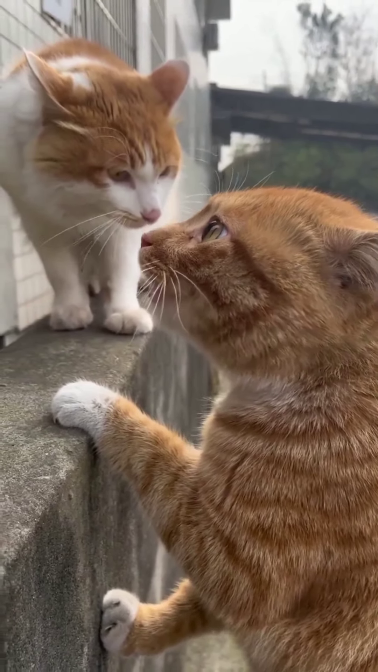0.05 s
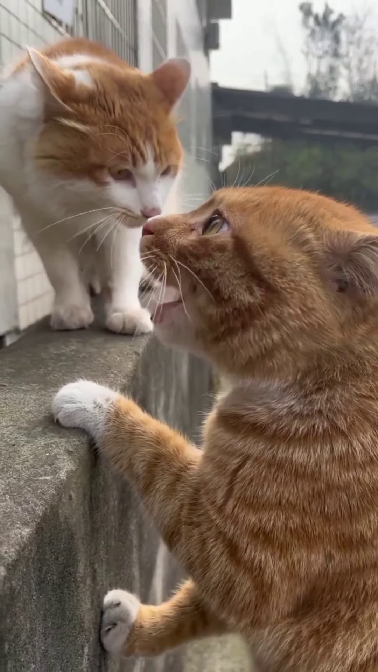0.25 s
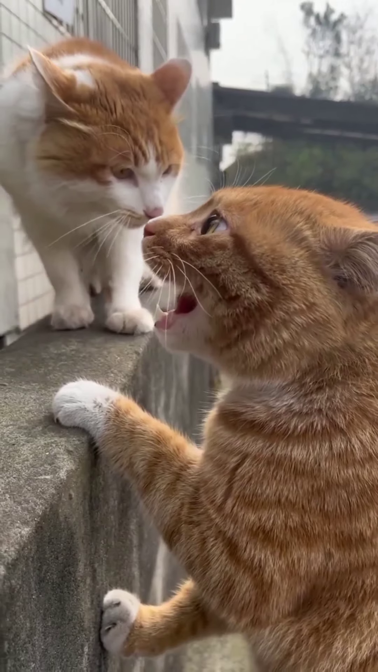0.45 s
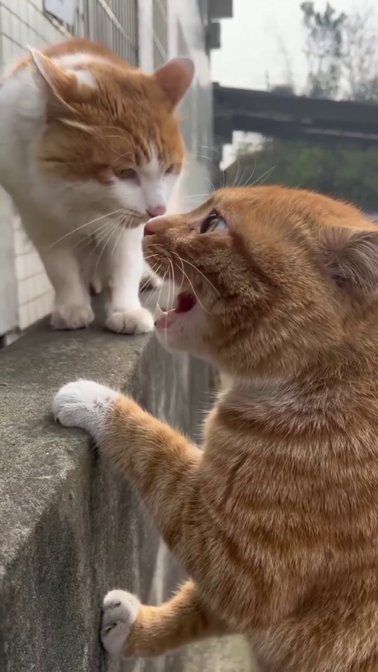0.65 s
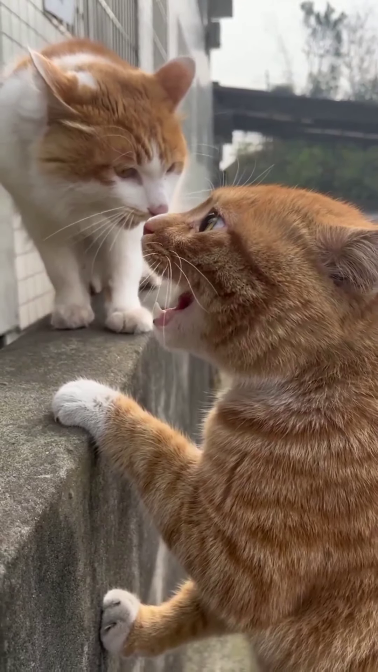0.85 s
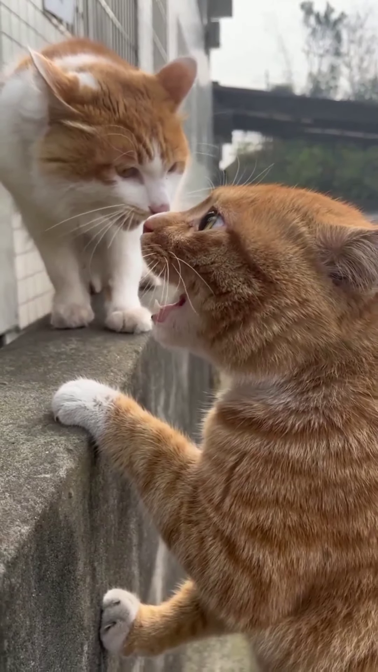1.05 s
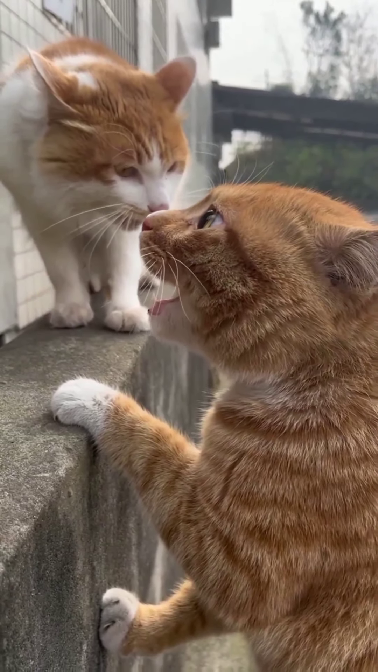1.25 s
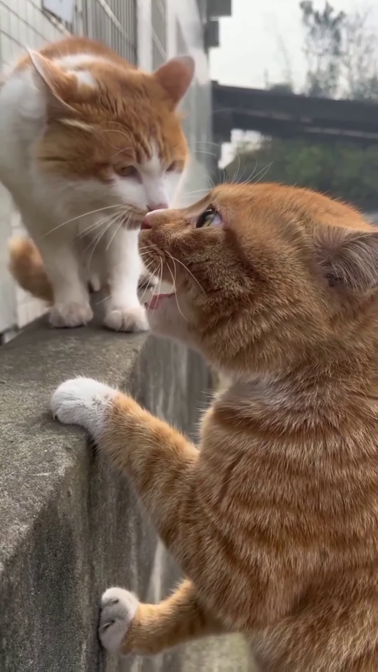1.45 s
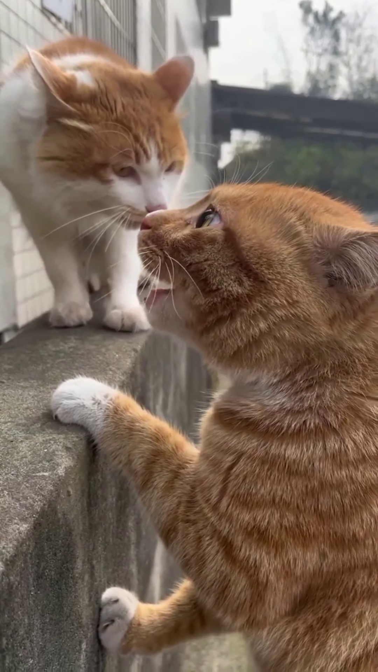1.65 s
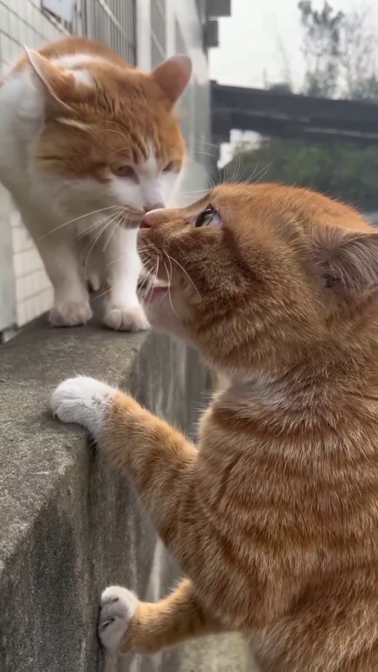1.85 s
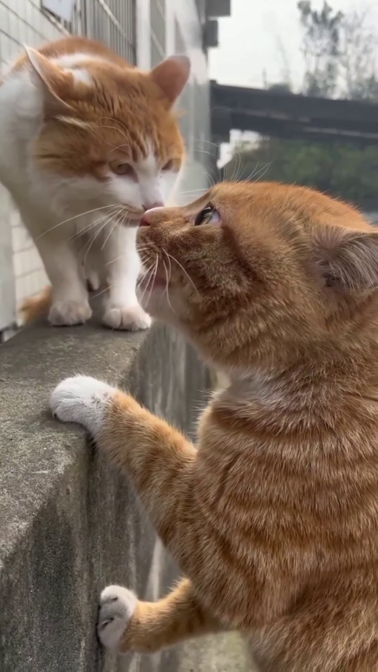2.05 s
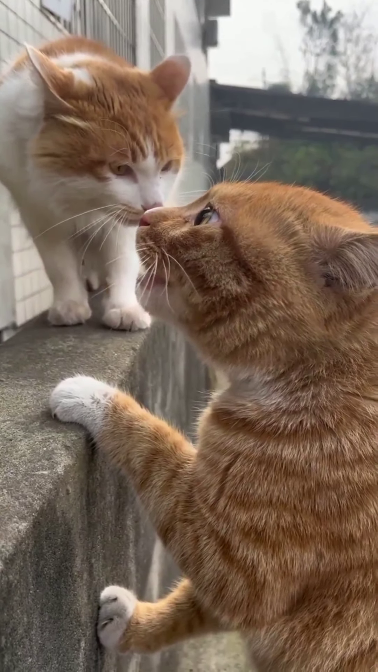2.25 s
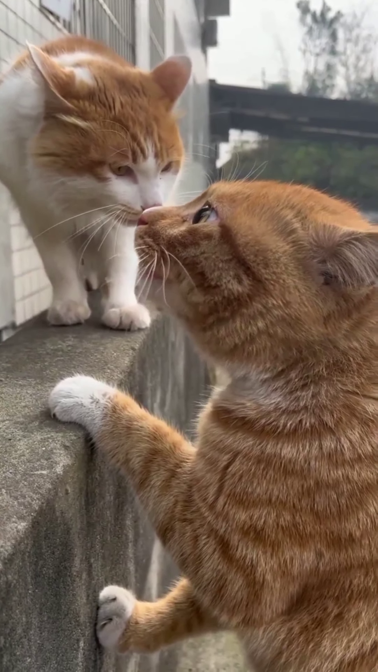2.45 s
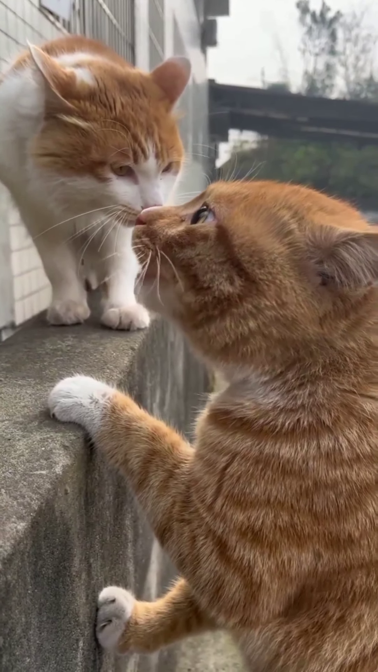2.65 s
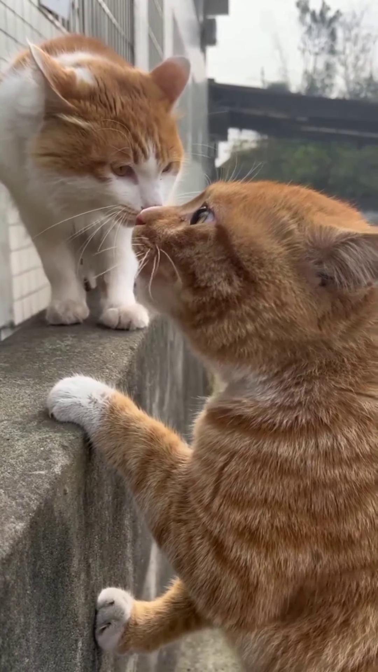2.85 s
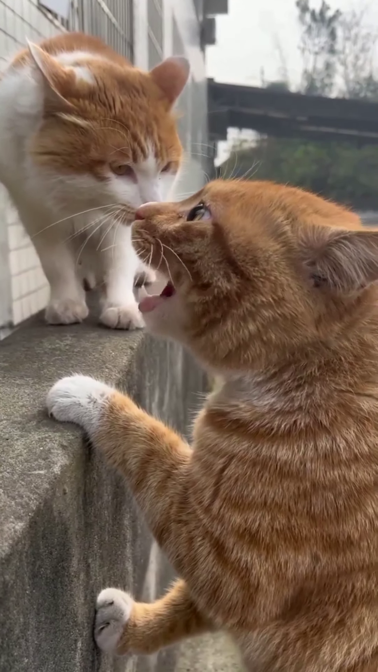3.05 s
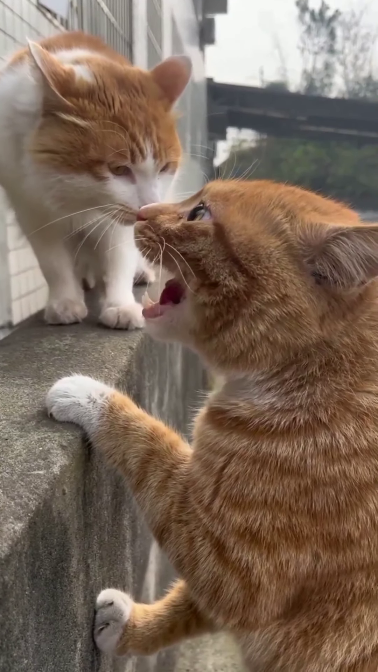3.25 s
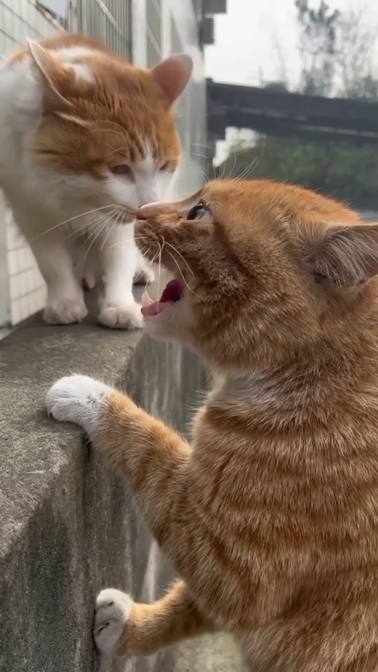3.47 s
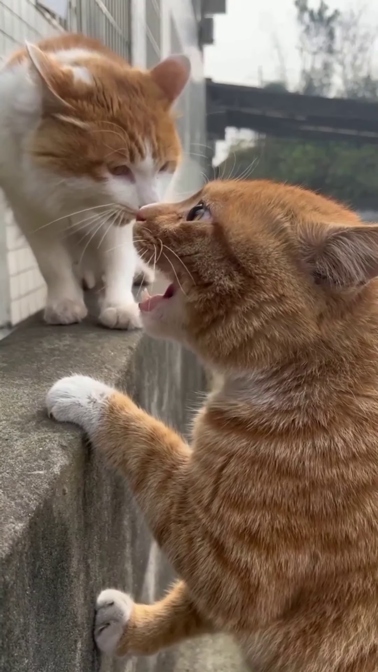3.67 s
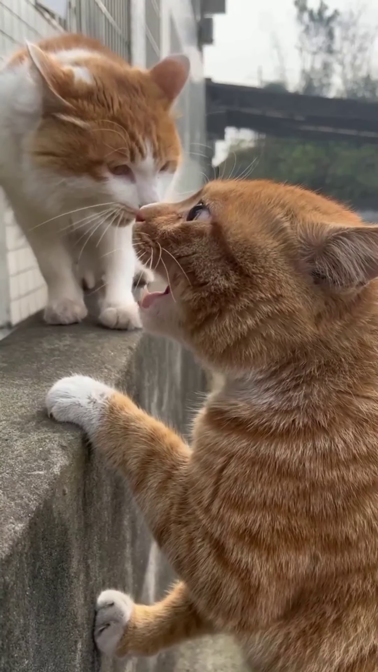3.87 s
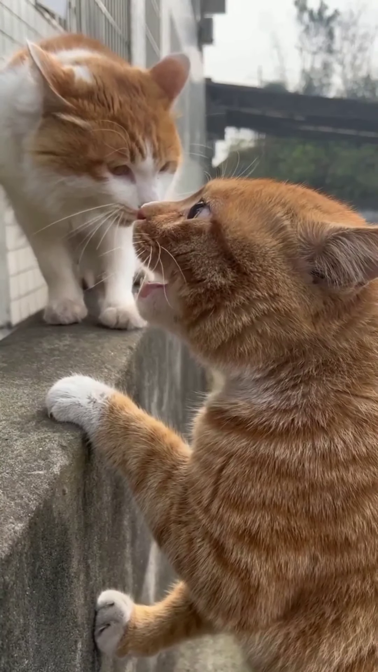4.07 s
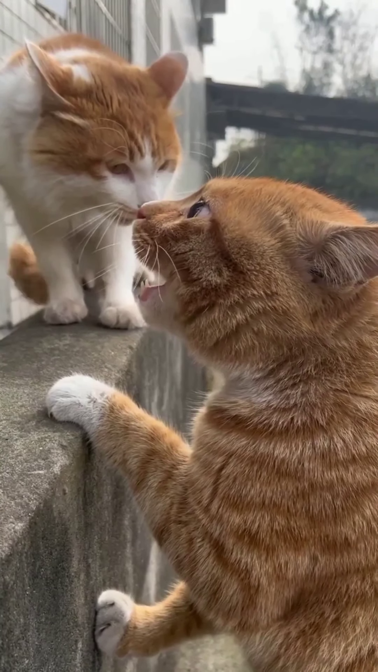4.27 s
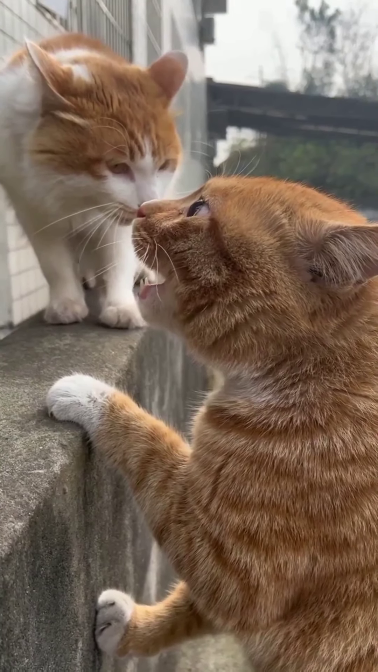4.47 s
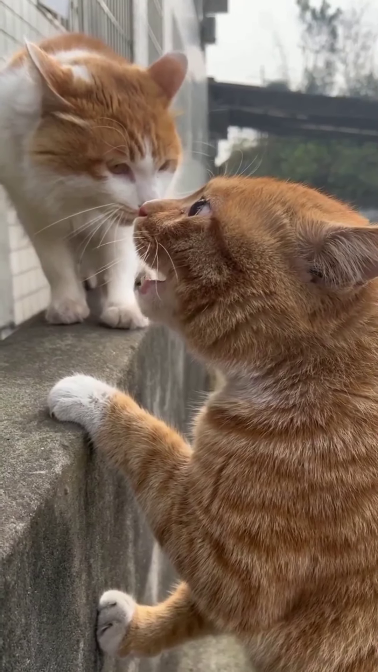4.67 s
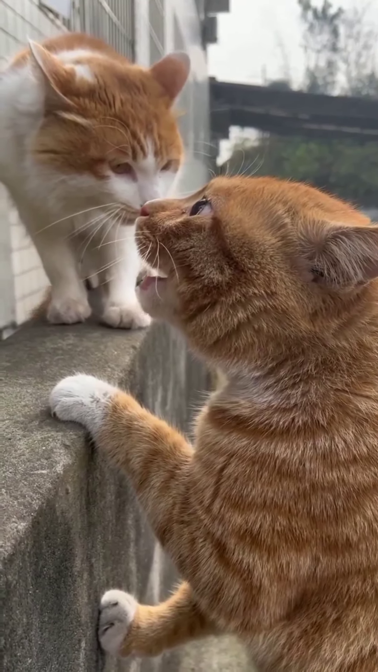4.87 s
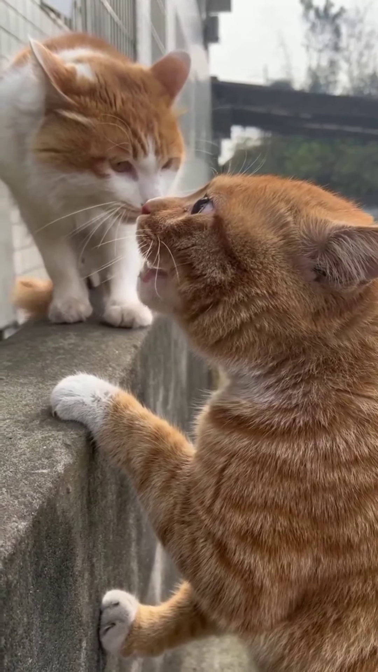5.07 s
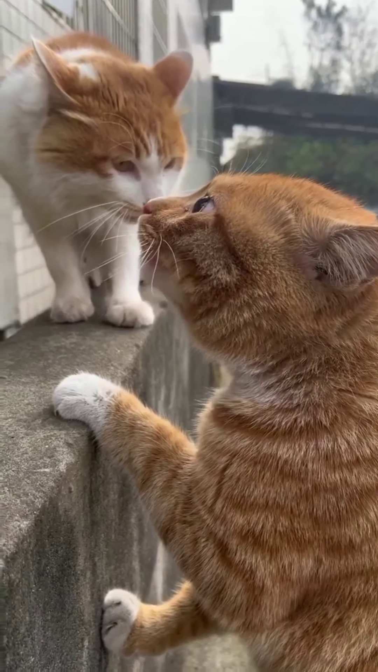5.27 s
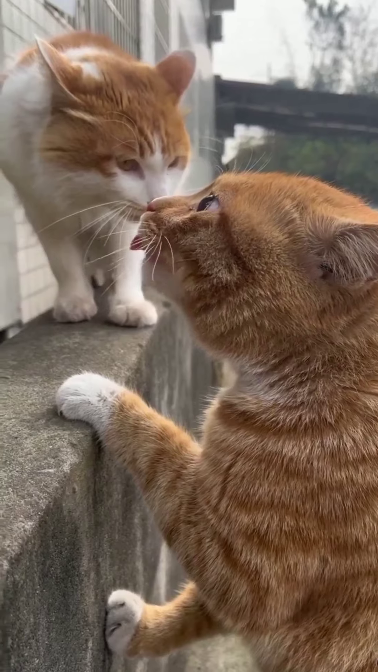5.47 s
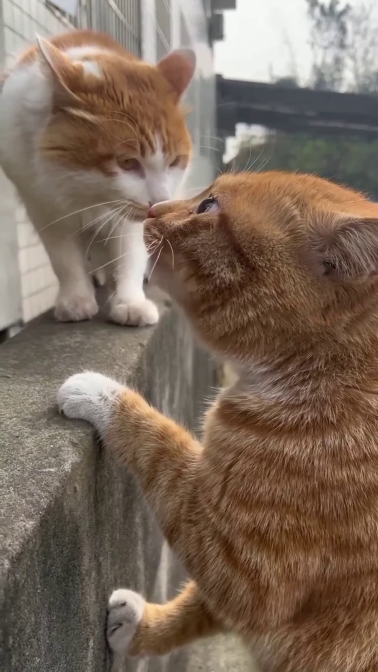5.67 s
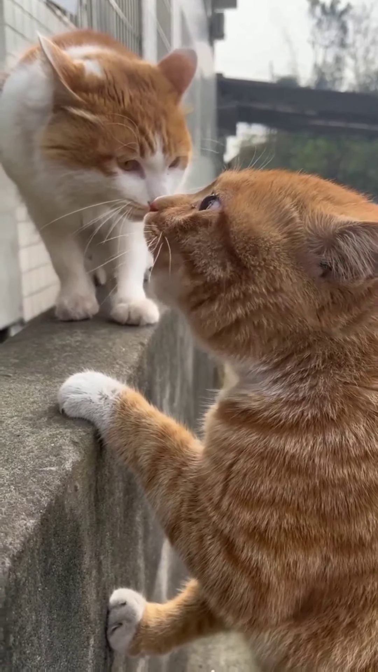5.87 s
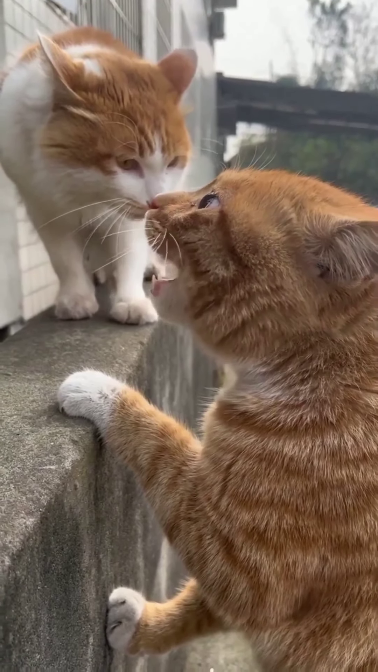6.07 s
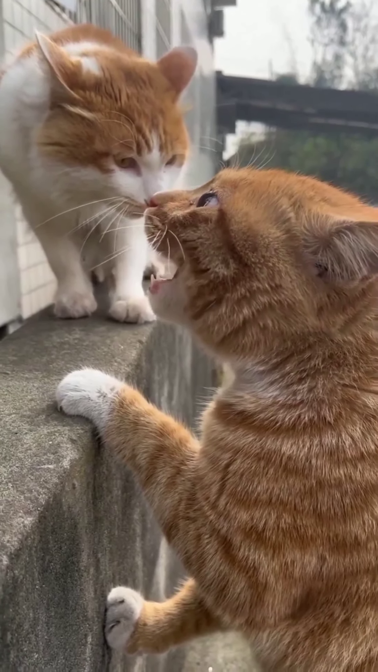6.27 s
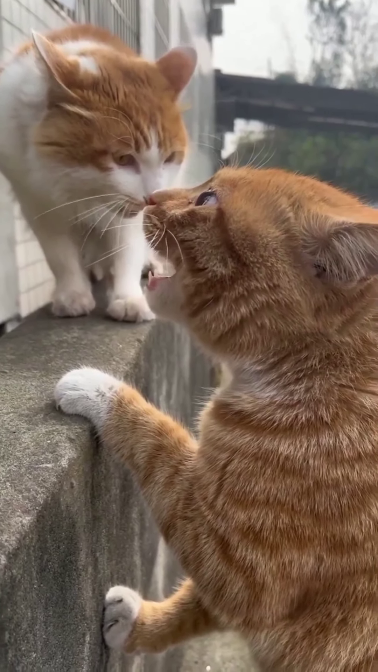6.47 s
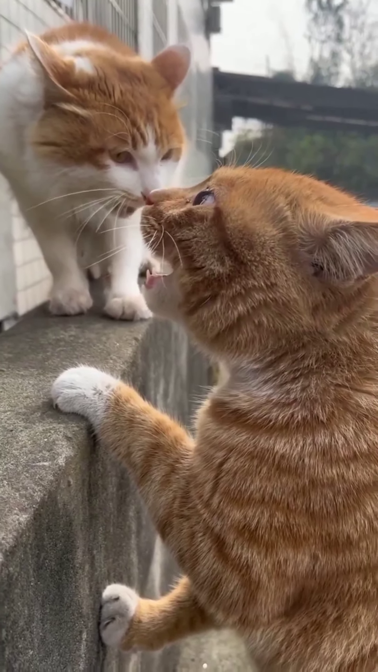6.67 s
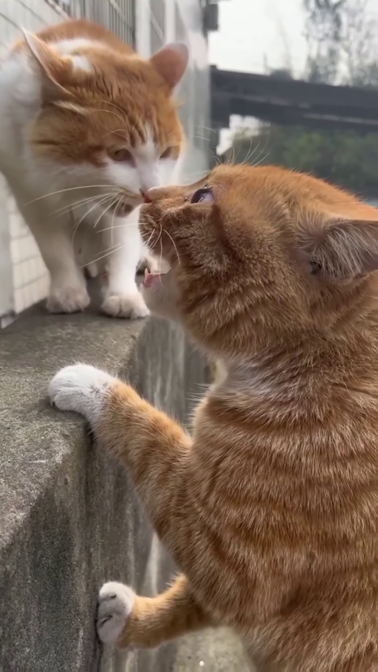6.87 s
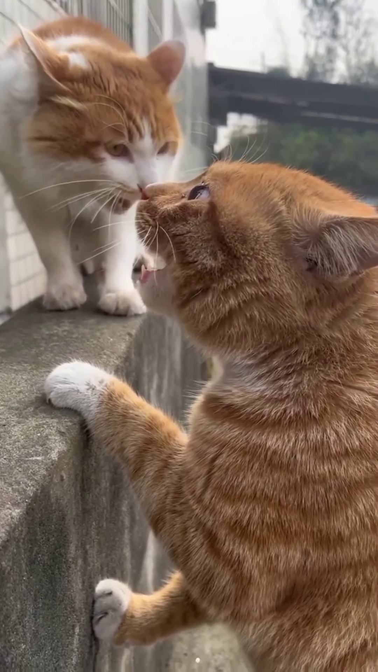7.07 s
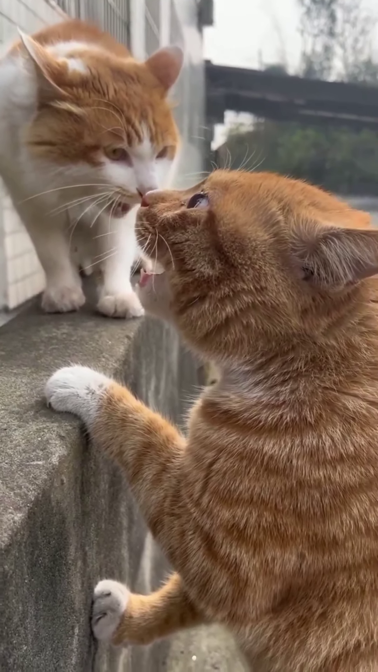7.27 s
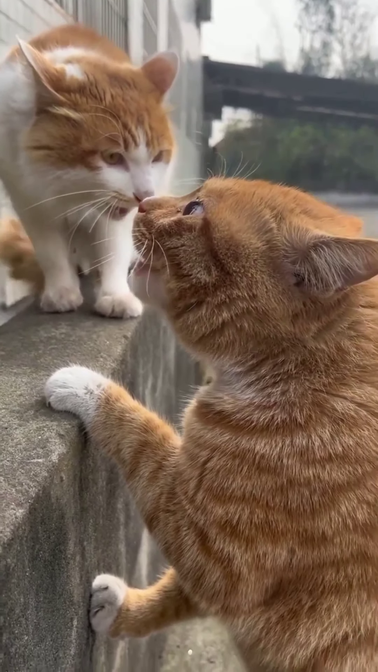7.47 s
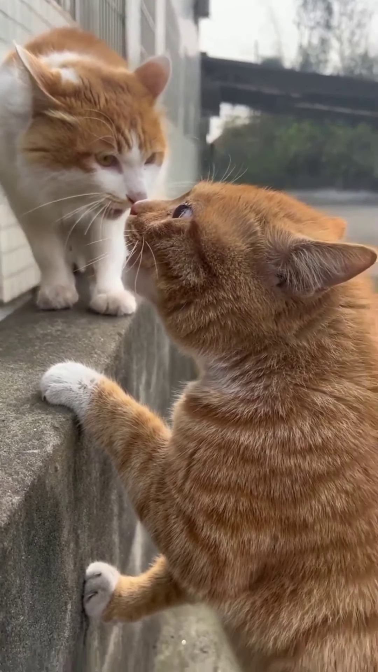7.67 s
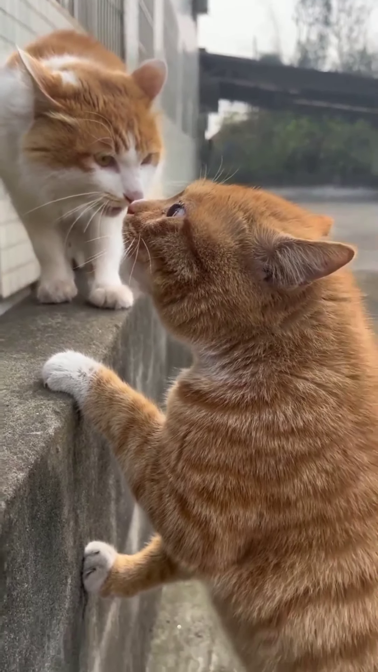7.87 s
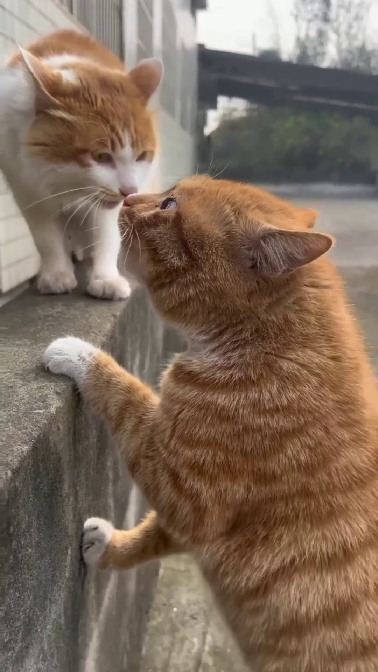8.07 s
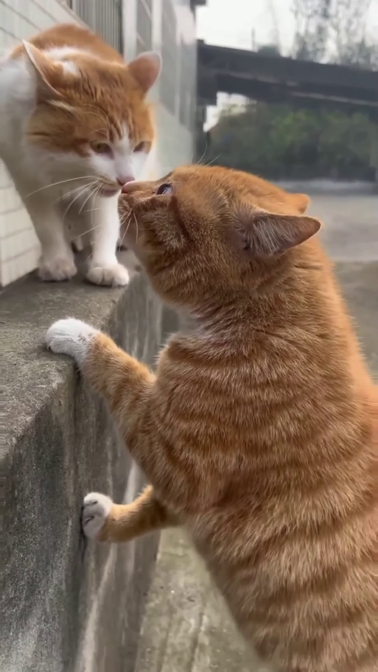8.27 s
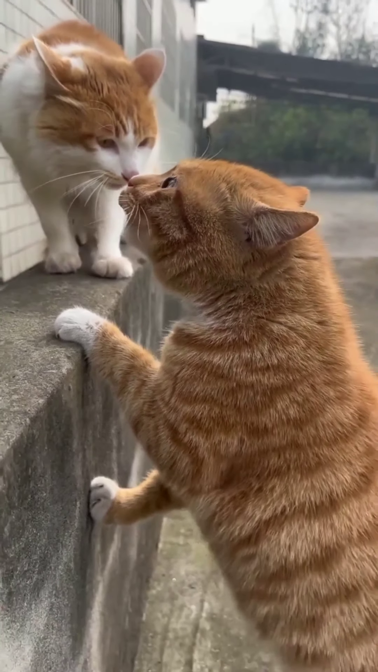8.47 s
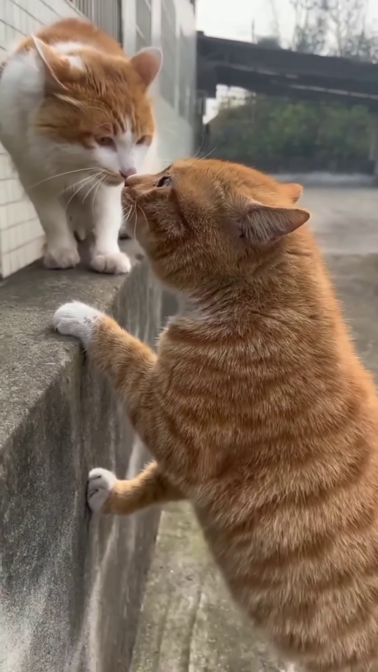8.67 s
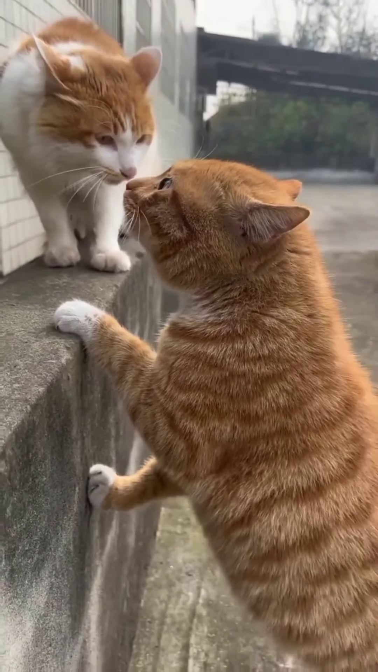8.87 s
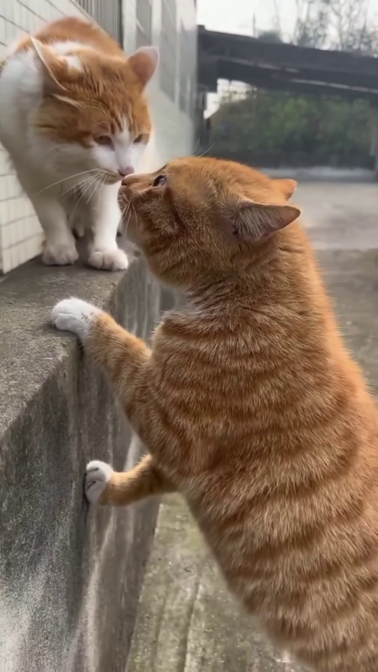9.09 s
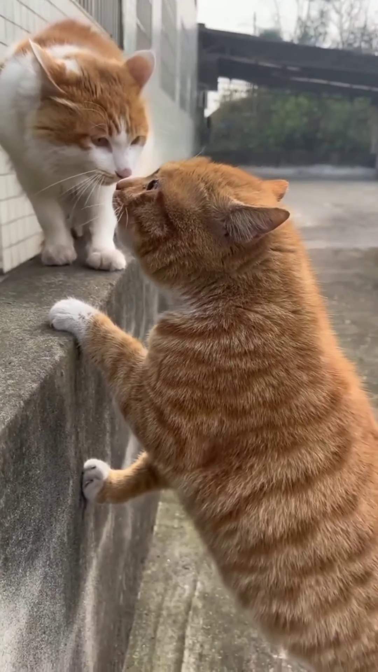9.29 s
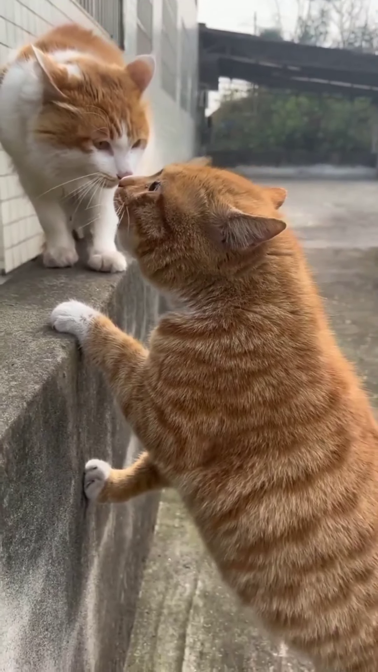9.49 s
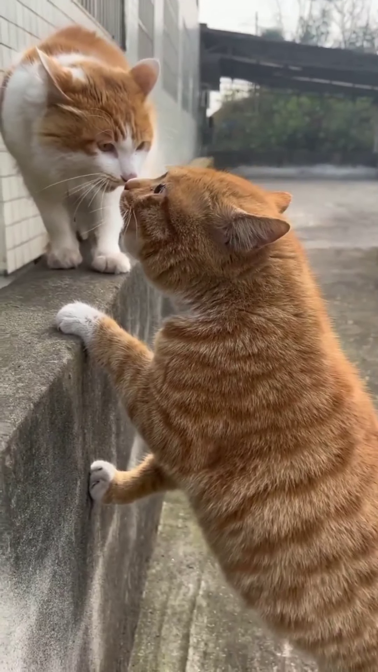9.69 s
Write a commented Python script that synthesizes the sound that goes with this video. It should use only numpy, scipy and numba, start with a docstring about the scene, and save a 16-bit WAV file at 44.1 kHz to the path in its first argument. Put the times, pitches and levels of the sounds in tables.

```python
"""Two cats yowl on a garden wall

Each long wail is a buzz of the vocal folds with hiss in every cycle, shaped by two moving mouth resonances.
A ginger and a white cat overlap, following drawn pitches; the jaw lifts the first resonance.
The treble glances off the wall top, and wall and ground return a faint, dull echo.
Behind them: a wavering engine drone, traffic rumble, a wash of air and three tiny claw scrapes."""
import sys
import numpy as np
from scipy import signal
from scipy.fft import rfft, irfft, next_fast_len
from scipy.io import wavfile
from scipy.ndimage import uniform_filter1d, map_coordinates
from numba import njit

SR = 44100
rng = np.random.default_rng(int(sys.argv[2]) if len(sys.argv) > 2 else 0)


def dump_mix(stems):
    """Bounce the given channels to the path in sys.argv[1] as a 16-bit WAV at rate SR."""
    frames = np.atleast_2d(stems).T  # one column per channel
    limited = np.clip(frames, -1, 1)  # hard clip at full scale
    pcm = np.round(limited * 32767).astype(np.int16)
    wavfile.write(sys.argv[1], SR, pcm)


N = 429093
TIME = np.arange(N) / SR
BINS_HZ = np.fft.rfftfreq(N, 1 / SR)
TOP_HZ = 13200


def undb(db):
    """Decibels to gain."""
    return 10 ** (np.asarray(db) / 20)


def unit(x):
    """Scale to rms 1."""
    return x / np.sqrt(np.mean(x ** 2))


def curves(table, t):
    """Columns of a table, joined by straight lines along the first."""
    s, *columns = np.transpose(table)
    return [np.interp(t, s, column) for column in columns]


def along(points, hz):
    """Read (Hz, value) points on a log-frequency axis."""
    f, value = np.transpose(points)
    return np.interp(np.log(hz + 1), np.log(np.abs(f) + 1), value)


def colour(x, points):
    """Filter by a (Hz, dB) spectrum."""
    size = next_fast_len(len(x) + SR // 10)
    gain = undb(along(points, np.fft.rfftfreq(size, 1 / SR)))
    return irfft(rfft(x, size) * gain, size)[:len(x)]


def walk(rate_hz, size):
    """Smooth random curve of rms 1 that changes about rate_hz times a second."""
    hold = max(int(SR / rate_hz), 2)
    steps = np.repeat(rng.standard_normal(size // hold + 2), hold)
    return unit(uniform_filter1d(steps, hold)[:size])


# distant traffic, before the level offsets: time_s, drone_db, rumble_db
TRAFFIC_LEVELS = [(0, -65, -49.5), (1.5, -52.5, -56.5), (2.8, -62.5, -60), (3.8, -62, -56.5),
                  (5.2, -53, -59.5), (6.6, -64, -56), (7.2, -52.5, -58), (7.7, -71.5, -56),
                  (8.7, -60, -56.5), (9.2, -59, -55.5), (9.73, -63.5, -58)]
# rumble spectrum, relative: freq_hz, density_db
RUMBLE_SPECTRUM = [(25, -28.5), (45, -9.5), (62, 4), (90, -1.5), (125, -9), (200, -11.5), (400, -50.5)]
# air spectrum, relative: freq_hz, density_db
AIR_SPECTRUM = [(60, -13), (170, -4), (300, -3.5), (600, -12.5), (1400, -19.5), (2500, -32.5),
                (5000, -40.5), (13000, -53)]


def traffic(drone_hz, drone_offset_db, rumble_offset_db, air_db):
    """Wavering sine engine drone and noise rumble, alike in both ears, under a thin wide wash of air."""
    drone_db, rumble_db = curves(TRAFFIC_LEVELS, TIME)
    phase = 2 * np.pi * np.cumsum(drone_hz * (1 + 0.16 * walk(9.8, N))) / SR
    drone = unit(np.sin(phase) * undb(2.3 * walk(16, N))) * undb(drone_db + drone_offset_db)
    rumble = unit(colour(rng.standard_normal(N), RUMBLE_SPECTRUM)) * undb(rumble_db + rumble_offset_db)
    mid = colour(rng.standard_normal(N), AIR_SPECTRUM)
    side = colour(rng.standard_normal(N), AIR_SPECTRUM)
    side = colour(side, [(200, -18.5), (600, 1.5)])
    air = unit(np.array([mid + side, mid - side]))
    return drone + rumble + undb(air_db) * air


# scrapes on concrete: start_s, peak_db, centre_hz
CLAW_SCRAPES = [(8.588, -60, 1405), (8.928, -60, 7970), (8.95, -66, 8000)]


def claws(decay_s):
    """Each scrape is a tiny decaying noise burst around one centre frequency."""
    out = np.zeros(N)
    t = TIME[:SR // 10]
    for start_s, peak_db, centre_hz in CLAW_SCRAPES:
        burst = rng.standard_normal(len(t)) * np.exp(-t / decay_s)
        grit = colour(burst, [(centre_hz / 4, -20), (centre_hz, 0), (centre_hz * 2, -12)])
        out[int(start_s * SR):][:len(t)] += undb(peak_db) * grit / np.abs(grit).max()
    return out


def yard(x, wet_db, t60_s, damp_hz):
    """Scattered, duller echoes from wall and ground: decaying noise tails, unrelated left and right."""
    t = TIME[:SR]
    tail = rng.standard_normal((2, SR)) * undb(-60 * t / t60_s) * (t > .006)
    tail /= np.sqrt(np.sum(tail[0] ** 2))
    tail = signal.lfilter(*signal.butter(1, damp_hz, fs=SR), tail)
    return undb(wet_db) * signal.fftconvolve(x[None], tail, axes=1)[:, :N]


def bounce(x, lag_s, sway_s, bounce_db):
    """Treble glances off the wall top; as the heads sway the lag drifts and overtones swell and dip."""
    lag = lag_s + sway_s * uniform_filter1d(walk(3, N), SR // 5)
    treble = signal.lfilter(*signal.butter(2, 3000, "high", fs=SR), x)
    return x + undb(bounce_db) * map_coordinates(treble, [(TIME - lag) * SR], order=3)


# level difference of the two microphone ports: freq_hz, left_minus_right_db
PORT_LEVELS = [(250, 1), (500, -6.5), (820, -18), (1050, -7), (1500, -7), (2100, 1.5), (3200, -2),
               (7000, 1)]
# phase difference of the ports: freq_hz, left_lead_rad
PORT_LEADS = [(250, -1.4), (700, -0.75), (980, 0.36), (1400, 0.57), (1640, -2.5), (1850, 1.39), (2800, 2),
              (4800, 2), (6500, 3.5), (7600, 8), (12500, 8.5)]


def ports(x):
    """The body of the phone shades and delays the sound differently at its two ports."""
    ratio, lead_rad = undb(along(PORT_LEVELS, BINS_HZ)), along(PORT_LEADS, BINS_HZ)
    right = rfft(x) * np.sqrt(2 / (1 + ratio ** 2))
    left = right * ratio * np.exp(1j * lead_rad)
    return np.array([irfft(left, N), irfft(right, N)])


@njit
def resonance(x, hz, width_hz):
    """Moving two-pole resonance: flat below its centre, falling above."""
    y, band, low = np.empty(len(x)), 0., 0.
    for i in range(len(x)):
        g, k = np.tan(np.pi * hz[i] / SR), width_hz / hz[i]
        v = (band + g * (x[i] - low)) / (1 + g * (g + k))
        y[i] = low + g * v
        band, low = 2 * v - band, 2 * y[i] - low
    return y


def folds(hz, rough, jitter, shimmer, waver):
    """Buzz of equal harmonics, less even the rougher the voice, and a puff of turbulence every cycle."""
    size = len(hz)
    stretch = 1 + waver * walk(25, size) + jitter * rough * walk(220, size)
    phase = 2 * np.pi * np.cumsum(hz * stretch) / SR
    buzz = np.zeros(size)
    for k in range(1, int(TOP_HZ / np.median(hz)) + 2):
        buzz += np.sqrt(2) * np.cos(k * phase)
    puffs = (1 + np.cos(phase)) * rng.standard_normal(size)
    return buzz * (1 + shimmer * rough * walk(400, size)), rough * puffs


def span(pitch):
    """Mask of the samples that a wail lasts."""
    return (TIME >= pitch[0][0]) & (TIME <= pitch[-1][0])


SHUT_HZ, GAPE_HZ = 500, 2280  # first mouth resonance, jaw shut and wide open
PRESS_S = 0.64  # decay time of the pressed onset


def mouth_shape(t, jaw, effort_db, second_hz, bright_db, gape_db, press_db):
    """The jaw lifts the first resonance and the brightness; pressed folds at the start sound brighter."""
    first_hz = SHUT_HZ + jaw * (GAPE_HZ - SHUT_HZ)
    pressed_db = press_db * np.exp(-(t - t[0]) / PRESS_S)
    return effort_db, first_hz, second_hz, bright_db + jaw * gape_db + pressed_db


# air hissing between the teeth: freq_hz, gain_db
TEETH_SPECTRUM = [(1400, -18.5), (2200, -14.5), (3300, -20.5), (4200, -1), (5100, -2.5), (6000, -17),
                  (7600, -17.5), (12500, -17)]
GLIDE_S = .02  # time the folds need to change pitch


def cat(pitches, mouths, throat, first_width_hz, second_width_hz, taut_hz, slack_rough, onset_rough,
        jitter, shimmer, flutter_db, hiss_db, attack_s, release_s):
    """Wails start hoarse, ring cleaner at high pitch and fray as it sinks; mouth resonances shape the buzz."""
    voice, hiss = np.zeros(N), np.zeros(N)
    for pitch, mouth in zip(pitches, mouths):
        on = span(pitch)
        t = TIME[on]
        since_s, left_s = t - t[0], t[-1] - t
        hz = uniform_filter1d(curves(pitch, t)[0], int(GLIDE_S * SR), mode="nearest")
        effort_db, first_hz, second_hz, bright_db = mouth
        fade = np.clip(np.minimum(since_s / attack_s, left_s / release_s), 0, 1)
        effort = undb(effort_db) * fade
        # taut folds swing evenly; slack or just starting folds do not
        slack = np.clip((taut_hz - hz) / 70, 0, 1)
        rough = .12 + slack_rough * slack + onset_rough * np.exp(-since_s / .045)
        buzz, puffs = folds(hz, rough, jitter, shimmer, waver=0.001)
        # harder closing folds lift the treble; its level also wavers at random
        soft = signal.lfilter(*signal.butter(1, 2000, fs=SR), buzz)
        source = soft + undb(bright_db + flutter_db * walk(14, len(t))) * (buzz - soft)
        source = resonance(source, first_hz, float(first_width_hz))
        voice[on] += effort * resonance(source, second_hz, float(second_width_hz))
        # a hard, rough voice hisses in spurts, bypassing the mouth resonances
        hiss[on] += effort * puffs * undb(hiss_db + bright_db + 6.0 * walk(30, len(t)))
    return colour(voice, throat) + colour(hiss, TEETH_SPECTRUM)


# law of pitch, jaw (0 shut, 1 gaping) and effort, before wail level: pitch_hz, jaw_0_1, effort_db
WHITE_PITCH_LAW = [(300, 0, -54.5), (407, 0.15, -47.5), (476, .05, -43), (519.5, 0.33, -43.5),
                   (579, .32, -36), (631, 0.37, -31)]
# one row per wail: level_db, bright_db, shut_second_resonance_hz, least_jaw_0_1
WHITE_TONES = [(0.2, -15, 2030, .03), (-0.04, -20, 2300, .06), (0.5, -12, 2440, .19), (-1.2, -6, 1880, .06)]


def white_mouths(pitches, spread_hz):
    """The white cat's jaw and effort follow its pitch, and the jaw lifts both resonances."""
    for pitch, (level_db, bright_db, shut_hz, least_jaw) in zip(pitches, WHITE_TONES):
        t = TIME[span(pitch)]
        jaw, effort_db = curves(WHITE_PITCH_LAW, curves(pitch, t)[0])
        jaw = np.maximum(jaw, least_jaw)
        second_hz = shut_hz + jaw * spread_hz
        yield mouth_shape(t, jaw, effort_db + level_db, second_hz, bright_db, gape_db=14, press_db=4)


# fold pitch, one list per wail: time_s, pitch_hz
WHITE_WAIL_PITCH = [
    [(0.5, 418.6), (0.6, 508.5), (0.768, 584), (1.08, 606), (1.356, 570.2), (1.598, 525), (2.1, 474.6),
     (2.436, 387), (2.678, 369.7), (2.77, 338)],
    [(3.35, 425.2), (3.598, 592.5), (3.682, 598), (3.906, 569.6), (3.98, 526.6), (3.984, 585.0),
     (4.188, 566.2), (4.292, 522.8), (4.926, 497.7), (5.3, 415.8), (5.52, 400), (5.829, 290.2)],
    [(6.3, 432.6), (6.432, 582), (6.868, 626.7), (7.332, 623.5), (7.66, 576.3), (7.812, 494),
     (8.142, 426.4), (8.266, 332)],
    [(9.02, 370.2), (9.112, 467.7), (9.402, 481), (9.606, 598.4), (9.728, 607.4)],
]
# fixed colour of throat, nose and higher resonances: freq_hz, gain_db
WHITE_THROAT_SPECTRUM = [(350, 8), (600, -1), (950, 4), (1250, -9.5), (1500, -5.5), (1850, -8.5),
                         (2100, -9.5), (2500, -7), (2800, -5.5), (3150, -9.5), (4000, 0.5), (5100, 19),
                         (8200, 15.5), (12500, 38.5)]


def white_cat():
    """Wails with broad mouth resonances and an uneven treble level."""
    mouths = white_mouths(WHITE_WAIL_PITCH, spread_hz=1090)
    return cat(WHITE_WAIL_PITCH, mouths, WHITE_THROAT_SPECTRUM, first_width_hz=268, second_width_hz=410,
               taut_hz=587, slack_rough=0.61, onset_rough=0.94, jitter=0.0042, shimmer=0.018,
               flutter_db=7.0, hiss_db=-14.5, attack_s=0.032, release_s=.06)


# jaw gesture, one list per wail, effort before wail level: time_s, jaw_0_1, effort_db
GINGER_GESTURES = [
    [(0.01, 0.07, -39.3), (0.092, 0.38, -36), (0.307, 0.86, -36), (0.939, 0.71, -34), (1.009, 0.6, -35.5),
     (1.494, 0.34, -37), (1.865, 0.19, -36.0), (2.16, 0.0, -44)],
    [(2.772, 0.06, -41.5), (2.909, 0.69, -34.5), (3.108, 1, -35.5), (3.348, 0.94, -35.5),
     (3.947, 0.53, -37), (4.517, 0.53, -38), (4.759, 0.23, -39), (5.019, 0.08, -39.5), (5.097, 0.07, -50.5)],
    [(5.755, 0.08, -58.5), (5.794, 0.15, -41), (5.857, 0.44, -39), (6.04, 0.76, -40.5),
     (6.693, 0.69, -38.0), (7.191, 0.56, -38.0), (7.38, 0.23, -40), (7.539, 0.03, -39.5),
     (7.718, 0.03, -50)],
    [(9.344, 0.06, -51), (9.385, 0.08, -40), (9.584, 0.32, -37.5), (9.729, 0.41, -38)],
]
# one row per wail: level_db, bright_db, gape_second_resonance_hz, lips_draw_back_s
GINGER_TONES = [(0.3, -7, 3400, .1), (0, -9, 3163, .08), (0.5, -9.5, 2720, .11), (0.6, -3, 2800, .7)]
# second resonance before lip rounding, up to half gape: jaw_0_1, resonance_hz
GINGER_SECOND_RESONANCE = [(0, 2260), (.14, 2200), (.33, 2500), (.56, 2450)]


def ginger_mouths(pitches, rounding_hz):
    """The ginger cat works its jaw freely; lips that start rounded lower the second resonance."""
    for pitch, gesture, tone in zip(pitches, GINGER_GESTURES, GINGER_TONES):
        level_db, bright_db, wide_hz, lips_s = tone
        t = TIME[span(pitch)]
        jaw, effort_db = curves(gesture, t)
        second_hz = curves([*GINGER_SECOND_RESONANCE, (1, wide_hz)], jaw)[0]
        second_hz = second_hz - rounding_hz * np.exp(-(t - t[0]) / lips_s)
        yield mouth_shape(t, jaw, effort_db + level_db, second_hz, bright_db, gape_db=2, press_db=0.5)


# fold pitch, one list per wail: time_s, pitch_hz
GINGER_WAIL_PITCH = [
    [(0.0, 338.5), (0.066, 457.7), (0.136, 508.9), (0.632, 525.8), (1.048, 524.3), (1.288, 493),
     (1.428, 464.7), (1.794, 425.0), (1.924, 392.7), (1.948, 429.6), (2.106, 378.5), (2.165, 324)],
    [(2.76, 298.2), (2.8, 364.3), (2.835, 492), (2.94, 496.3), (3.118, 532.7), (3.432, 531.8),
     (3.718, 511.3), (3.988, 488.8), (4.332, 497.4), (4.596, 466.7), (4.982, 375.2), (5.11, 349)],
    [(5.74, 363.4), (5.802, 424.7), (5.854, 481.1), (6.168, 504.6), (6.832, 501.7), (7.194, 484.7),
     (7.32, 457.4), (7.451, 397.2), (7.486, 452), (7.725, 354.5)],
    [(9.33, 257.5), (9.46, 399.5), (9.58, 445.5), (9.729, 462.6)],
]
# fixed colour of throat, nose and higher resonances: freq_hz, gain_db
GINGER_THROAT_SPECTRUM = [(350, 1), (600, -3), (950, 7), (1250, -1), (1500, .5), (1850, -16), (2100, -5),
                          (2500, -3), (2800, -8), (3150, 0), (3700, -4), (4250, -13), (4750, 14),
                          (6000, 11), (8200, 31), (12500, 27)]


def ginger_cat():
    """Wails with narrow mouth resonances, a hoarse onset and a quick attack."""
    mouths = ginger_mouths(GINGER_WAIL_PITCH, rounding_hz=720)
    return cat(GINGER_WAIL_PITCH, mouths, GINGER_THROAT_SPECTRUM, first_width_hz=200, second_width_hz=200,
               taut_hz=549.5, slack_rough=0.77, onset_rough=2.8, jitter=0.0055, shimmer=0.034,
               flutter_db=3.0, hiss_db=-10.5, attack_s=0.011, release_s=0.0069)


def scene():
    """Street, claws, echo and both cats."""
    street = traffic(drone_hz=46, drone_offset_db=1.0, rumble_offset_db=2.5, air_db=-62)
    scrapes = claws(decay_s=0.0052)
    cats = bounce(ginger_cat() + white_cat(), lag_s=0.001144, sway_s=.0001, bounce_db=-1.5)
    echo = yard(cats, wet_db=-14.0, t60_s=0.36, damp_hz=1620)
    return street + scrapes + echo + ports(cats)


def record(dry):
    """The phone cuts the top with a steep low-pass."""
    return signal.sosfilt(signal.ellip(10, .2, 80, TOP_HZ, fs=SR, output="sos"), dry)


dry = scene()
out = record(dry)
dump_mix(out)
```